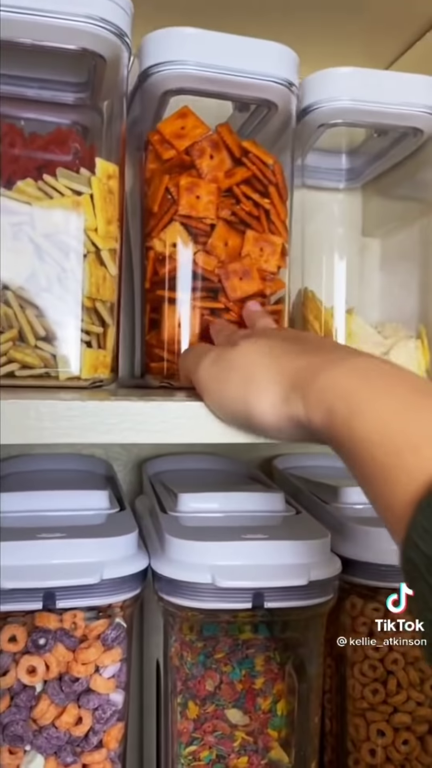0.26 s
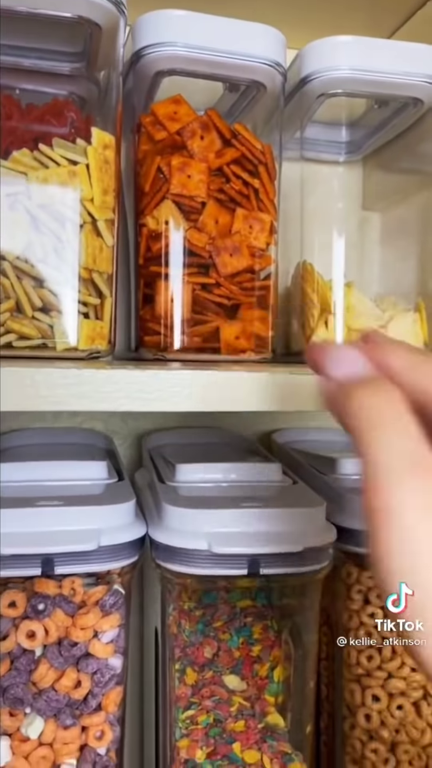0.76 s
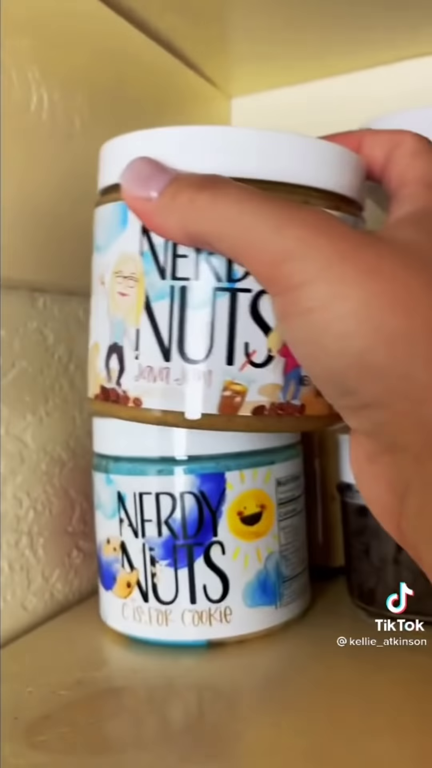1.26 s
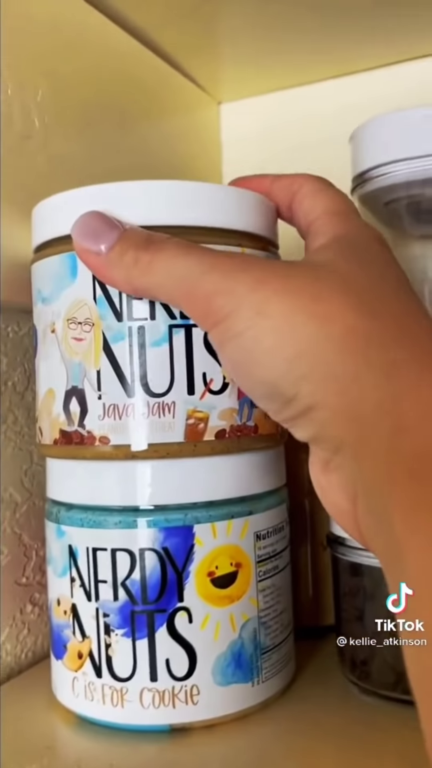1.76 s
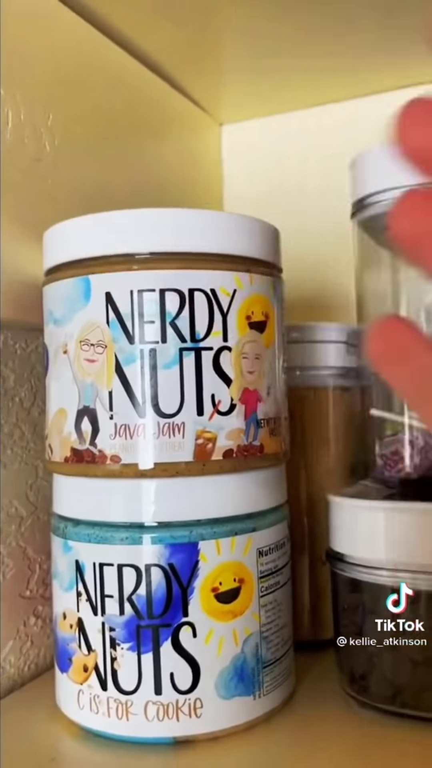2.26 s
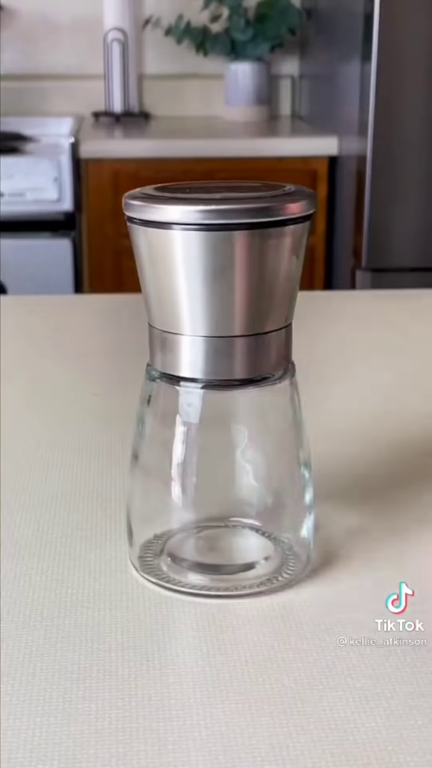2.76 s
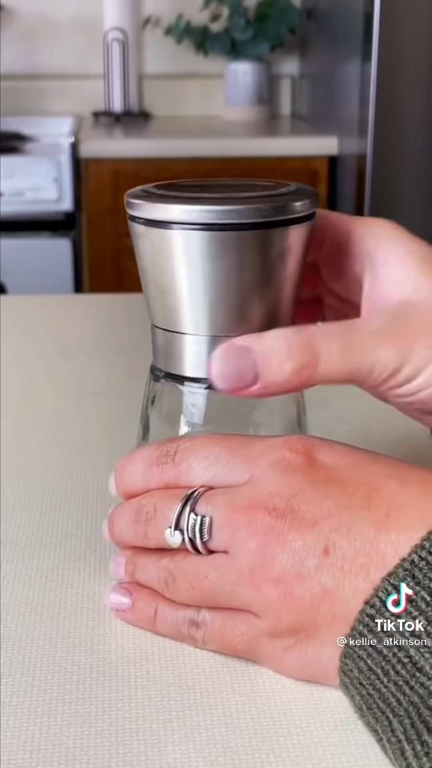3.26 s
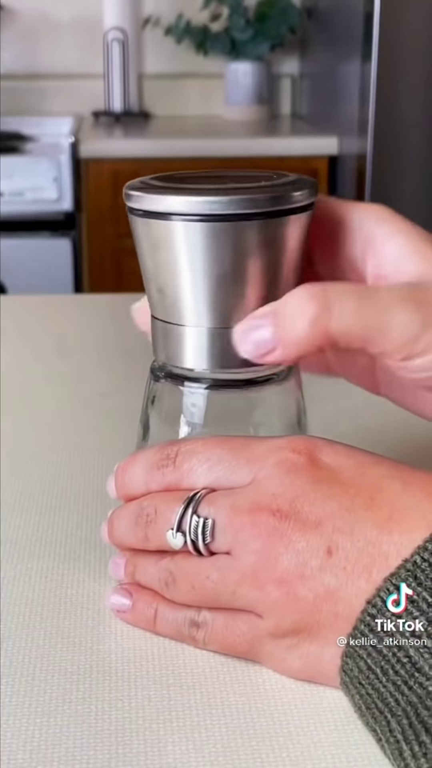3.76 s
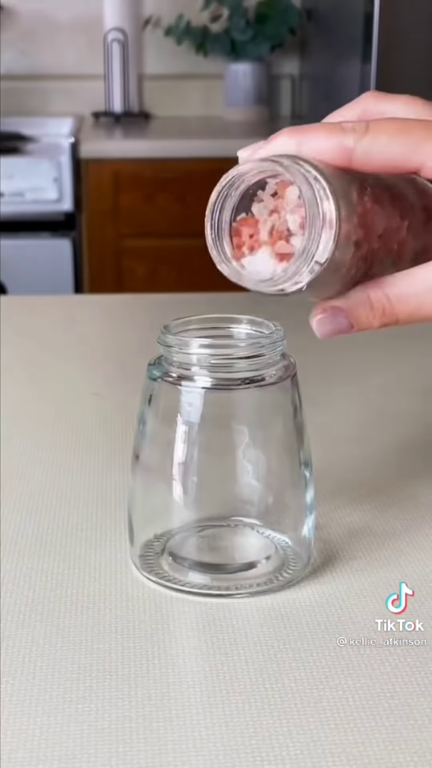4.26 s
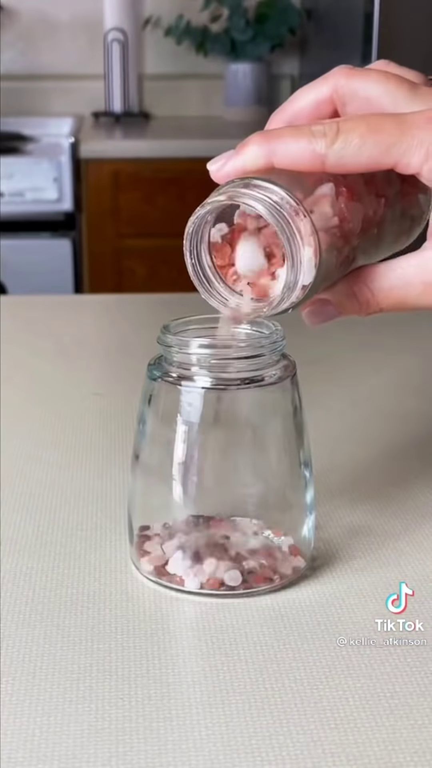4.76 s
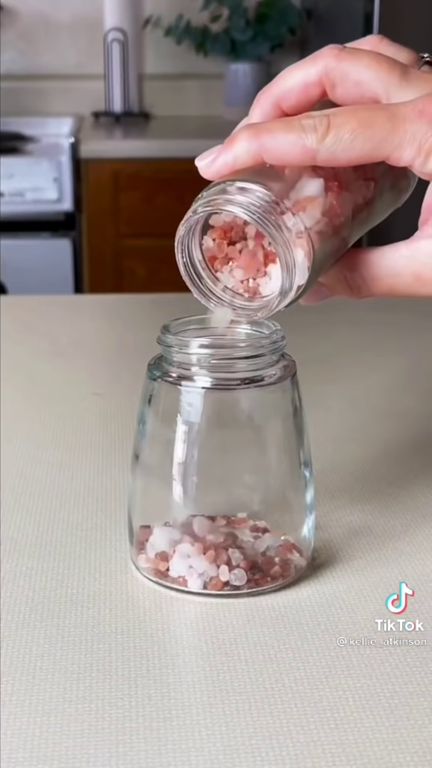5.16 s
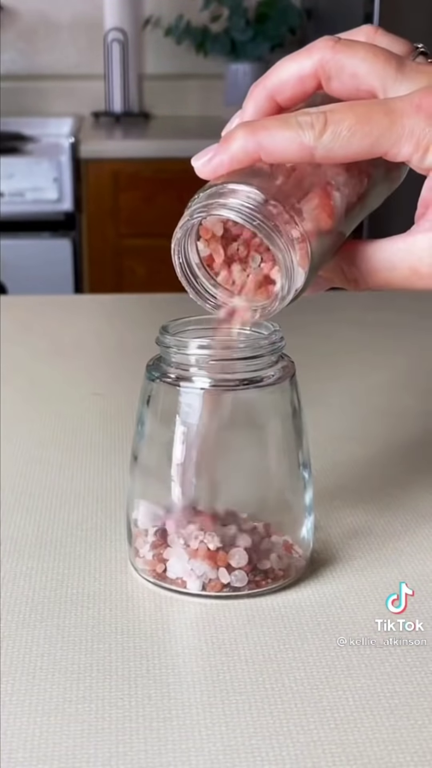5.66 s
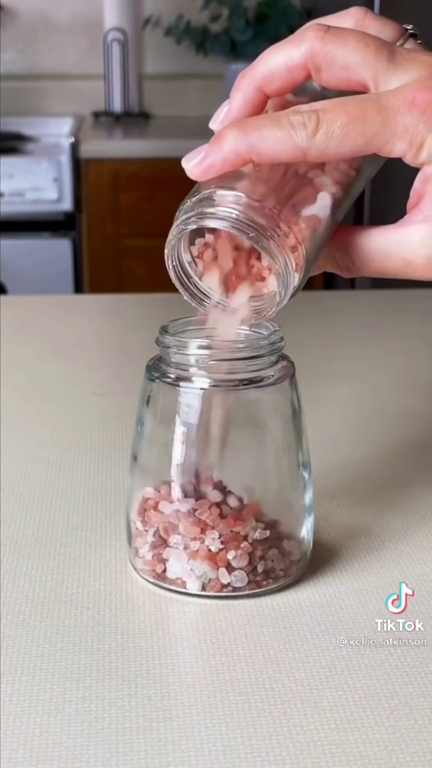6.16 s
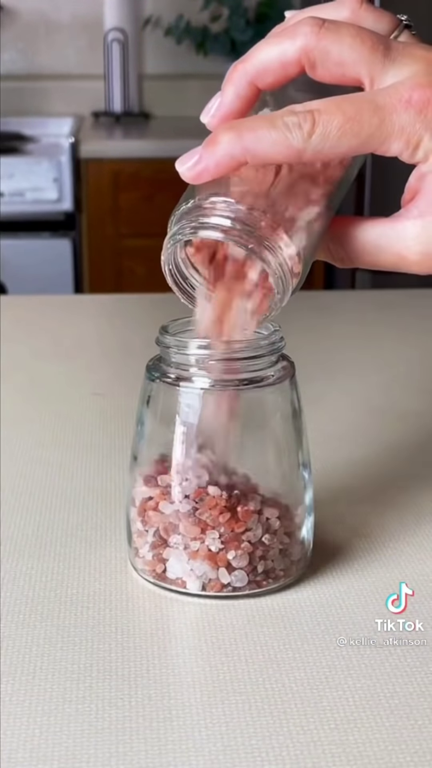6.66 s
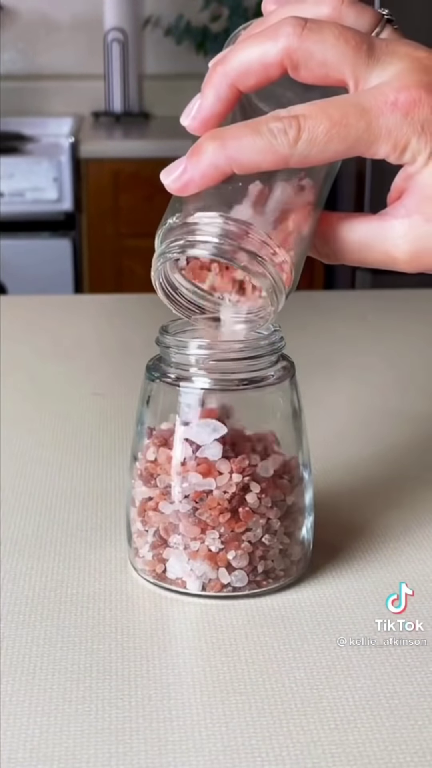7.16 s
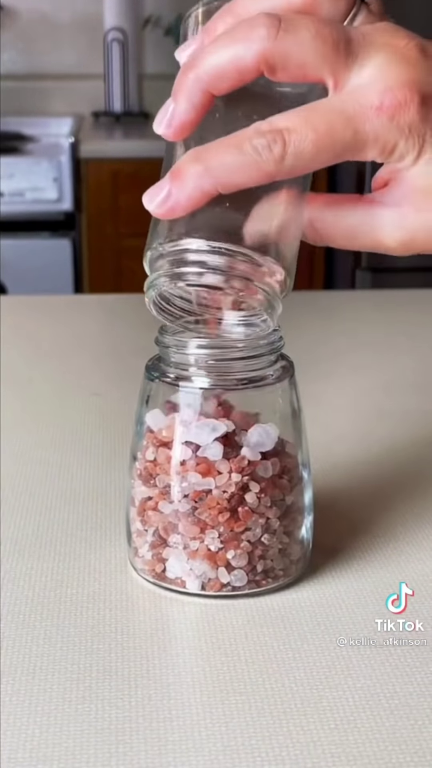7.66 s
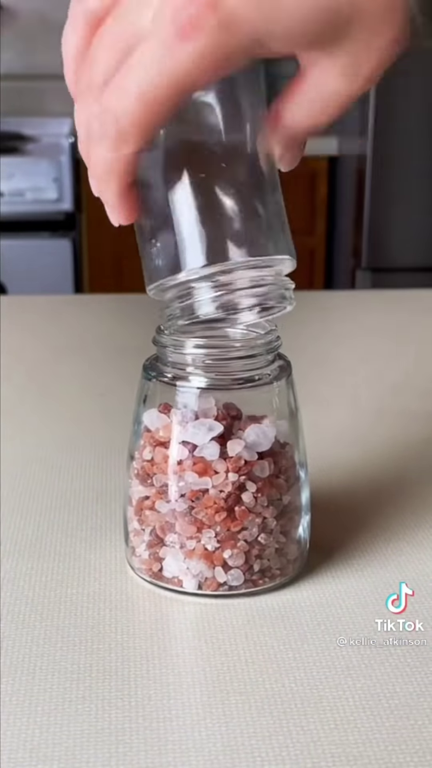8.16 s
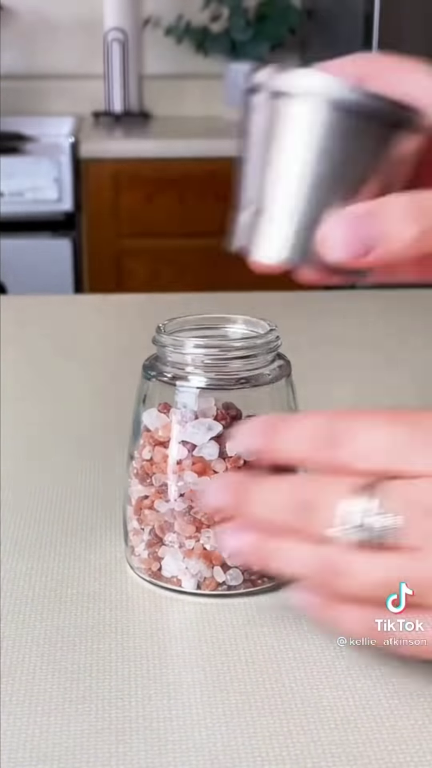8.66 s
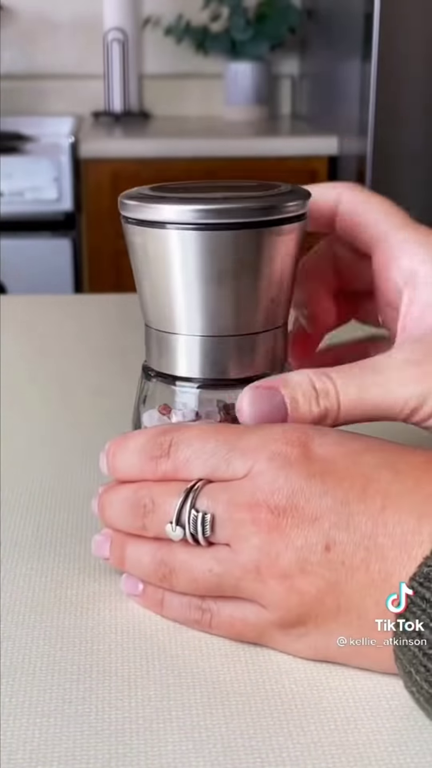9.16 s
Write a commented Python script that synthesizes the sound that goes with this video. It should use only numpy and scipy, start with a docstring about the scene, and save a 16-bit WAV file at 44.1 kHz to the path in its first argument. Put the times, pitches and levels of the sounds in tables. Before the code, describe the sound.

Close up in a pantry, a plastic tub of crackers scrapes and knocks on a wooden shelf, then a full jar thuds dully onto another. A glass grinder rattles briefly down on a kitchen counter. Its steel cap is unscrewed in scraping, clicking jerks. Coarse salt patters and fizzes into the glass, rims clink harder as the jar empties, and the cap is screwed on again.

```python
"""A tub of crackers slides and knocks onto a pantry shelf; one full jar thuds onto another. Then a glass
grinder chatters down on a counter, its steel cap is unscrewed in jerks, coarse salt patters and fizzes in
from a glass jar whose rim clinks on the neck, and the cap is screwed back on.
Knocks are dying modes or clicks through resonant bodies; rubbing and salt are clouds of tiny impacts.
Each source is a (mid, side) pair; a diffuse room tail and low rumble lie around them."""
import sys
import numpy as np
from scipy import signal
from scipy.fft import rfft, irfft
from scipy.io import wavfile
from scipy.ndimage import uniform_filter1d

SR = 44100
rng = np.random.default_rng(int(sys.argv[2]) if len(sys.argv) > 2 else 0)


def put_to_file(sound):
    """Save the sound as 16-bit audio at rate SR, in the file named by the first command-line argument."""
    columns = np.atleast_2d(sound).T  # one column per channel
    safe = np.clip(columns, -1, 1)
    whole_steps = np.round(safe * 32767)
    wavfile.write(sys.argv[1], SR, whole_steps.astype(np.int16))


N = 414981
HZ = np.fft.rfftfreq(4096, 1 / SR)
TIME = np.arange(N) / SR
AGE = TIME[:SR // 3]  # time since a hit [s]

# jar's rim and large crystals striking glass: (time [s], peak [dB], extra treble [dB])
CLINKS = [(4.4615, -36, 17), (4.618, -24, 1), (4.7274, -28.5, 6), (4.9473, -32, 12), (5.4972, -11, -3),
          (5.5433, -13.5, -3), (5.587, -16.5, 0), (5.682, -15.5, 4.5), (5.7453, -25.5, -25),
          (5.786, -25.5, -26), (5.8581, -23.5, -22), (6.223, -20, -7), (6.2489, -27.5, -20),
          (6.6767, -29, -41), (7.1645, -24, -13), (7.226, -30, 2), (7.2719, -33, 5), (7.3216, -35, 15),
          (7.3861, -27, -3), (7.436, -17.5, 3.5), (7.4891, -11, 6), (7.5493, -17, -0.5),
          (7.5959, -22.5, -2.5), (7.646, -22, -1.5), (7.6952, -10.5, -13), (7.747, -10, -9),
          (7.7876, -22.5, -27.5), (7.833, -31, -22.5), (7.885, -13.5, -2), (7.9292, -13, -5),
          (7.9769, -3.5, -2.5), (8.1665, -15.5, -1), (8.2163, -14.5, -3.5), (8.396, -34.5, -10),
          (8.4616, -12, 6), (8.5138, -26.5, 5), (8.5367, -34, -8)]
# broad colour of the glass: (frequency [Hz], level [dB])
GLASS_COLOUR = [(100, -30.5), (220, -2.5), (450, -6), (650, 0.5), (1400, -4), (2600, 1.5), (3050, -1.5),
                (3900, -1.5), (4600, -5.5), (5200, -3), (5750, -4.5), (6500, -12), (8000, -16.5),
                (10500, -24), (15500, -19)]


def gain_of(db):
    """Amplitude factor of a level in dB."""
    return 10 ** (np.asarray(db) / 20)


def evened(x):
    """Scales a (mid, side) pair to a mid RMS of one."""
    return x / np.sqrt(np.mean(x[0] ** 2) + 1e-20)


def sized(x, db, size=350):
    """Scales a hit so that the mid RMS of its first samples has the given level."""
    return gain_of(db) * x / np.sqrt(np.mean(x[0, :size] ** 2) + 1e-20)


def placed(x, width, left):
    """Scales the side of a (mid, side) pair and turns it to the left."""
    return np.array([x[0], width * x[1] + left * x[0]])


def add(mix, start_s, sound):
    """Mixes a sound in at a time, cut at the end of the mix."""
    part = mix[:, max(round(start_s * SR), 0):][:, :sound.shape[1]]
    part += sound[:, :part.shape[1]]


def wander(count, size):
    """Smooth chance of unit spread, changing over about size steps."""
    x = rng.standard_normal(count)
    x = uniform_filter1d(uniform_filter1d(x, size), size)
    return x / x.std()


def read(points, hz=HZ):
    """A spectrum joined by straight lines on a log-frequency axis."""
    point_hz, value = np.transpose(points)
    return np.interp(np.log(hz + 1), np.log(point_hz + 1), value)


def level(rows):
    """Gain along a dB curve over time, practically silent outside it."""
    return gain_of(np.interp(TIME, *np.transpose(rows), left=-150, right=-150))


def bells(rows):
    """Sum of resonance curves (frequency [Hz], width [Hz], height)."""
    return sum(height / (1 + (2 * (HZ - hz) / width_hz) ** 2) for hz, width_hz, height in rows)


def body(broad, peaks):
    """Response in dB of an object: a broad colour with resonances on top."""
    heights = [(hz, width_hz, gain_of(abs(db)) - 1) for hz, width_hz, db in peaks]
    return read(broad) + 20 * np.log10(1 + bells(heights))


def glass_body(broad, extra=()):
    """Response in dB of the glass standing on the counter."""
    # resonances: (frequency [Hz], width [Hz], height [dB])
    peaks = [(902, 54, 6.4), (1150, 130, 6.4), (1483, 50, 6.4), (1895, 46, 8.8), (2191, 54, 7.6),
             (2590, 96, 2.5), (3340, 160, 4.5), (3966, 320, 4.2), (5100, 350, 3.2), (7700, 300, 4.6)]
    # bands that glass and its counter echo cancel: (frequency [Hz], width [Hz], change [dB])
    dips = [(1430, 33, -11.5), (2072, 87, -13), (2970, 210, -8.5), (3560, 130, -4.5), (4780, 140, -4),
            (6120, 170, -7.5), (7660, 440, -2)]
    return body(broad, [*peaks, *extra]) + bells(dips)


def colour(x, db):
    """Minimum-phase filter with the given response, so that resonances ring after a click."""
    cepstrum = irfft(np.log(gain_of(db)))
    half = len(cepstrum) // 2
    cepstrum[1:half] *= 2  # folding the cepstrum makes the filter causal
    cepstrum[half + 1:] = 0
    impulse = irfft(np.exp(rfft(cepstrum)))
    return signal.oaconvolve(x, impulse[None], axes=1)[:, :x.shape[1]]


def blow(chatter_db, t60_s, dull_hz):
    """One brief contact from straight ahead, then duller chatter and echoes from nearby surfaces."""
    pole = np.exp(-2 * np.pi * dull_hz / SR)
    force = signal.lfilter([1 - pole], [1, -pole], rng.standard_normal((2, len(AGE))))
    fade = 1000 ** (-AGE / t60_s)
    force *= gain_of(chatter_db) * fade / np.linalg.norm(fade)
    click = 1. * (AGE == 0)
    force[0] += signal.lfilter(*signal.butter(2, 7500, fs=SR), click)
    return force


def ring(modes, pitch, loose):
    """Dying modes after a cushioned blow; the loose contents of the container roughen their decay."""
    tone = sum(gain_of(db) * 1000 ** (-AGE / t60_s) * np.sin(2 * np.pi * hz * pitch * AGE)
               for hz, db, t60_s in modes)
    cushioned = tone * (1 - np.exp(-AGE / 0.00078))
    rattle = np.exp(-AGE / 0.014)
    force = loose * rng.standard_normal((2, len(AGE))) * rattle / np.linalg.norm(rattle)
    force[0, 0] += 1
    return signal.fftconvolve(force, cushioned[None], axes=1)[:, :len(AGE)]


def tick(db):
    """The short snap of hard plastic."""
    # (frequency [Hz], level [dB])
    snap_colour = [(200, -22), (800, -15.5), (1500, 3), (2200, 0.5), (2700, -6.5), (4000, -6), (5500, -11),
                   (8000, -17), (11000, -20.5), (16000, -17.5)]
    return sized(colour(blow(chatter_db=5.5, t60_s=0.049, dull_hz=9000), read(snap_colour)), db)


def grains(per_s, spread_db, response, clump_db, count=6):
    """Random tiny impacts in clumps; several spots on the body each ring a little differently."""
    out = np.zeros((2, N))
    for _ in range(count):
        at = np.flatnonzero(rng.random(N) < per_s / count / SR)
        clumps = wander(N // 64 + 1, size=12)[at // 64]
        impact_db = spread_db * np.minimum(rng.exponential(1, len(at)), 4) + clump_db * clumps
        force = np.zeros((2, N))
        force[:, at] = gain_of(impact_db) * rng.choice([-1, 1], (2, len(at)))
        out += colour(force, response + 3.5 * wander(len(HZ), size=22))
    return evened(out)


def strokes(rows, rise_share, sag_db_per_s, t60_s):
    """Gain of moves (time [s], length [s], level [dB]): each swells, sags while it lasts, then dies away."""
    start, length, db = np.transpose(rows)[:, :, None]
    t = TIME[::64]
    age = np.maximum(t - start, 0)
    fade = 1000 ** (-np.maximum(age - length, 0) / t60_s)
    swell = np.minimum(age / (rise_share * length), 1)
    gains = swell * gain_of(db - sag_db_per_s * np.minimum(age, length)) * fade
    return np.interp(TIME, t, np.linalg.norm(gains, axis=0))


def contacts(rows, response, crest_db, t60_s, dull_hz, chatter_db, bass_db, softness, spot_db, detune):
    """Hits (time [s], peak [dB], treble [dB]) on a body response(time); gentler ones get more bass."""
    out = np.zeros((2, N))
    usual_db = np.mean([db for _, db, _ in rows])
    low, high = 1 / (1 + (HZ / 800) ** 2), 1 - 1 / (1 + (HZ / 6800) ** 6)
    for s, db, treble_db in rows:
        tilt = (bass_db + softness * (usual_db - db)) * low + treble_db * high
        spot = spot_db * wander(len(HZ), size=20)  # each point of contact favours other modes
        shift = 1 + detune * rng.standard_normal()  # the grip shifts them a little
        modes = np.interp(HZ * shift, HZ, response(s))
        hit = colour(blow(chatter_db, t60_s, dull_hz), modes + tilt + spot)
        add(out, s + 0.00074, sized(hit, db - crest_db))
    return out


def air():
    """Low room rumble, coloured noise: the pantry's, a moment of silence, then a blend into the kitchen's."""
    # (frequency [Hz], level [dB])
    pantry_colour = [(15, -70.5), (25, -45), (123, -3.5), (195, -9), (317, -14.5), (363, -32), (476, -23),
                     (516, -27.5), (1890, -48.5), (4490, -51.5), (5880, -58.5), (11300, -58), (16000, -53)]
    kitchen_colour = [(15, -90.5), (25, -45), (149, -14), (236, 2.5), (326, -14.5), (354, -2), (560, -16),
                      (624, -12), (695, -16.5), (796, -27), (1130, -26.5), (1740, -38), (8360, -48.5),
                      (14800, -51), (16000, -47)]
    pantry_ends_s, kitchen_starts_s = 2.419, 2.44
    in_pantry, in_kitchen = (evened(colour(rng.standard_normal((2, N)), read(points)))
                             for points in (pantry_colour, kitchen_colour))
    blend = np.clip((TIME - 2.45) / .5, 0, 1)
    audible = 1. * ((TIME < pantry_ends_s) | (TIME > kitchen_starts_s))
    rumble = gain_of(-50.5) * np.sqrt(1 - blend) * in_pantry + gain_of(-53.0) * np.sqrt(blend) * in_kitchen
    return uniform_filter1d(audible, size=200) * rumble


def room(x):
    """A diffuse noise tail on the mid signal, each band dying at its own speed."""
    # (frequency [Hz], t60 [s])
    decay = [(100, 0.57), (500, 0.41), (2000, 0.2), (6000, 0.18), (15000, 0.19)]
    hz, t, z = signal.stft(rng.standard_normal((2, SR // 2)), SR, nperseg=256)
    fade = 1000 ** (-t / read(decay, hz)[:, None])
    build_up = np.minimum(t / 0.036, 1)
    tail = signal.istft(z * fade * build_up, SR, nperseg=256)[1]
    return signal.oaconvolve(x[:1], tail / np.linalg.norm(tail[0]), axes=1)[:, :N]


def hands():
    """Skin and sleeve hiss faintly over the containers: dense tiny impacts."""
    # fingers and sleeve brushing: (time [s], length [s], relative level [dB])
    brushes = [(-0.05, 0.2, -52.5), (0.2, .2, -55.5), (0.4, 0.4, -58), (0.72, .14, -55.5),
               (0.98, 0.088, -70.5), (1.27, 0.54, -62), (2.27, 0.011, -45), (2.71, 0.23, -70),
               (4.02, .1, -73.5)]
    # (frequency [Hz], level [dB])
    skin_colour = [(500, -6), (2000, -2), (5000, -3.5), (8000, -4), (10000, -7.5), (15000, -8)]
    touch = strokes(brushes, rise_share=0.25, sag_db_per_s=20, t60_s=0.15)
    hiss = grains(per_s=5000, spread_db=-0.5, response=read(skin_colour), clump_db=-1.5)
    return gain_of(2.0) * touch * hiss


def pantry():
    """The tub slides and knocks on a wooden shelf, its crackers shifting inside; full jars thud dully."""
    # shoves sliding the tub: (time [s], length [s], level [dB])
    shoves = [(-0.01, 0.23, -28.5), (0.25, 0.15, -34.5), (0.43, 0.13, -44.5), (0.68, 0.18, -50)]
    # tub knocks: (time [s], shelf thud [dB], plastic clack [dB], sharp tick [dB], shelf pitch [factor])
    tub_knocks = [(0.013, -26, -29, -57, 1.14), (0.054, -44, -40, -41.5, 1.33),
                  (0.081, -31, -34.5, -54, 0.88), (0.168, -33.5, -40.5, -60, 1.0),
                  (0.513, -16, -33.5, -37.5, 1.106), (0.562, -30, -46.5, -63, 1.07),
                  (0.657, -21.5, -18, -32.5, 1.05), (0.8179, -53, -45.5, -29, 0.97),
                  (0.951, -51, -57.5, -64, 1.02)]
    # jar bumping on jar, fingers letting go: (time [s], thud [dB], tick [dB])
    jar_bumps = [(1.411, -36, -56), (1.524, -45, -58.5), (1.779, -22, -44.5), (1.797, -37, -66),
                 (1.815, -36.5, -72), (1.89, -50, -72), (2.026, -50.5, -66), (2.186, -48.5, -66.5),
                 (2.258, -38, -65.5), (2.274, -36.5, -55)]
    # modes of shelf, tub and jars: (frequency before pitch factor [Hz], level [dB], t60 [s])
    shelf_modes = [(77, -14.5, 0.47), (131.3, -7, 0.22), (190.3, 0, 0.11), (256, 4, 0.083),
                   (320, 7.5, 0.034), (367, -0.5, 0.089), (493, 0, 0.051), (677, -10, 0.07)]
    tub_modes = [(464, 0, 0.031), (618, 8.5, 0.016), (790, -11, 0.02), (937, -3, 0.034),
                 (1118, -6.5, 0.035), (1537, 10.5, 0.024), (1430, -15.5, 0.066), (1920, -26.5, 0.047)]
    jar_modes = [(114, -15, 0.42), (155.2, -12, 0.43), (197, 2, 0.13), (283, -2.5, 0.077), (380, -8, 0.077),
                 (604, -13, 0.062), (800, -20, 0.056)]
    # rubbing and cracker colours: (frequency [Hz], level [dB])
    rub_colour = [(50, -20), (120, -17), (250, 4.5), (400, -1.5), (750, -7), (1000, -14.5), (1700, -16),
                  (2500, -21), (4000, -30), (9000, -46)]
    cracker_colour = [(500, -27.5), (900, -3.5), (1500, 0), (2200, -7), (3200, -4.5), (5000, -17.5),
                      (9000, -31.5)]
    # rubbing resonances: (frequency [Hz], width [Hz], height [dB])
    rub_peaks = [(193, 33, 1), (396, 34, 2.5), (760, 50, 10), (1540, 240, 11.5), (2120, 156.5, 0.5)]
    slide = strokes(shoves, rise_share=.15, sag_db_per_s=49.5, t60_s=0.23)
    rubbing = grains(per_s=900, spread_db=2.5, response=body(rub_colour, rub_peaks), clump_db=0.5)
    crackers = grains(per_s=390, spread_db=0.0, response=read(cracker_colour), clump_db=-3.5)
    out = placed(slide * rubbing + gain_of(-20.5) * slide * crackers, width=.8, left=.2)
    for s, thud_db, clack_db, tick_db, pitch in tub_knocks:
        add(out, s, placed(sized(ring(shelf_modes, pitch, loose=0.76), thud_db), width=.5, left=.25))
        add(out, s, placed(sized(ring(tub_modes, 0.928, loose=0.38), clack_db), width=1.1, left=.55))
        add(out, s, tick(tick_db))
    for s, thud_db, tick_db in jar_bumps:
        thud = placed(sized(ring(jar_modes, 0.93, loose=0.75), thud_db), width=0.46, left=0.21)
        add(out, s, thud + tick(tick_db))
    # the pantry sounds carry no deep bass below about 68 Hz
    return signal.sosfilt(signal.butter(8, 68, "high", fs=SR, output="sos"), out)


def grinder_base():
    """The thick glass base rocks quickly to rest on the counter: a burst of clicks through its resonances."""
    # (time [s], level [dB])
    rocks = [(2.4414, -25.5), (2.449, -26.5), (2.456, -29.5), (2.466, -27), (2.485, -27.5), (2.493, -34),
             (2.504, -29.5), (2.52, -30.5), (2.716, -64.5)]
    # (frequency [Hz], level [dB])
    base_colour = [(100, -74), (350, -10.5), (500, -3.5), (900, -3), (1500, -4.5), (2500, 0), (3500, -6.5),
                   (5000, -12.5), (7000, -23.5), (10000, -26), (15000, -31.5)]
    # (frequency [Hz], width [Hz], height [dB])
    base_peaks = [(889, 38, 19.6), (1250, 38, 12), (1680, 69, 2.6), (2244, 49, 12), (2560, 100, 7.1),
                  (3300, 100, 5), (4250, 90, 11), (5010, 150, 8), (10300, 390, 7.6)]
    out, response = np.zeros((2, N)), body(base_colour, base_peaks)
    for s, db in rocks:
        add(out, s, sized(colour(blow(chatter_db=12.5, t60_s=0.14, dull_hz=7200), response), db))
    return placed(out, width=0.57, left=.05)


def steel_cap():
    """The cap jerks along the thread: snap, scrape, knock to a stop; pressed home, the counter grumbles."""
    # jerks on the glass thread: (time [s], peak [dB], slip length [s], extra treble [dB])
    catches = [(3.02, -33.5, 0.0058, -14), (3.208, -31.5, .004, 0), (3.231, -24.5, 0.0097, 3),
               (3.283, -24.5, 0.021, -26), (3.395, -22, 0.021, 10), (3.448, -25, 0.015, 5),
               (3.477, -24.5, 0.019, -3), (3.537, -18.5, 0.021, 6), (3.6329, -17, .002, 3),
               (3.677, -18, .019, -4), (3.721, -17.5, 0.023, 7), (3.773, -19, 0.014, -3),
               (3.847, -23.5, 0.018, -4), (3.888, -19.5, 0.0052, 12), (3.932, -23.5, .012, 5),
               (8.845, -24, .004, 4.5), (8.876, -29.5, 0.009, 13), (8.969, -27.5, .005, 5),
               (9.053, -29, 0.0044, 4), (9.11, -22.5, 0.0095, 12), (9.153, -32, 0.02, 12),
               (9.194, -24, 0.021, 9), (9.252, -15.5, 0.01, 9), (9.288, -16, 0.0075, 0),
               (9.337, -38, 0.0049, -12)]
    # steel and counter colours: (frequency [Hz], level [dB])
    steel_colour = [(80, -46.5), (210, 12.5), (310, 0), (420, 7.5), (550, 2), (800, 5), (1600, -3),
                    (2400, 0), (4000, -9), (5200, -9), (6800, -18.5), (8500, -17.5), (12000, -28),
                    (15500, -29.5)]
    counter_colour = [(120, -27.5), (220, 1.5), (420, 4.5), (680, 8), (900, 3), (1300, -5), (2500, -43)]
    # steel resonances: (frequency [Hz], width [Hz], height [dB])
    steel_peaks = [(695, 41, 5.9), (886, 55, 7.8), (1356, 40, 16.4), (1816, 26, 8.9), (2250, 47, 2.8),
                   (3430, 150, 6.1), (5210, 220, 5.3)]
    snap_chatter_db, stop_chatter_db = 7, 5.5
    stop_db, stop_treble_db = -4.5, -12  # stop against snap
    usual_slip_s = 0.018  # a longer slip ends in a harder knock
    press_from_s = 8.7  # cap going back on: jerks also press the glass on the counter

    response = body(steel_colour, steel_peaks)
    slips = [(s, slip_s, db) for s, db, slip_s, _ in catches]
    # scrape and press levels are against each jerk's peak
    scrape = gain_of(-21.5) * strokes(slips, rise_share=0.51, sag_db_per_s=0, t60_s=0.19)
    press = gain_of(-16) * strokes(slips, rise_share=0.98, sag_db_per_s=0, t60_s=0.13)
    press *= TIME > press_from_s
    damped = (response + read(steel_colour)) / 2  # the grip damps the ring
    rubbing = scrape * grains(per_s=900, spread_db=6.5, response=damped, clump_db=2.5)
    grumble = press * grains(per_s=1000, spread_db=2.5, response=read(counter_colour), clump_db=-0.5)

    snaps = [(s, db, treble_db) for s, db, _, treble_db in catches]
    stops = [(s + slip_s, db + stop_db + 10 * np.log10(slip_s / usual_slip_s), treble_db + stop_treble_db)
             for s, db, slip_s, treble_db in catches]
    knocks = sum(contacts(rows, lambda s: response, crest_db=11.5, t60_s=0.064, dull_hz=7170,
                          chatter_db=chatter_db, bass_db=-2.5, softness=1.0, spot_db=3.5, detune=0.044)
                 for rows, chatter_db in ((snaps, snap_chatter_db), (stops, stop_chatter_db)))
    return rubbing + grumble + knocks


def glass_rims():
    """The jar's mouth clinks and drags on the grinder's neck; its own ring is freer once nearly empty."""
    # jar's own ringing: (time [s], thin high ring [dB], bright lower ring [dB])
    jar_ring = [(5.6, -5, -0.5), (7.2, 25, 4), (7.75, 23.5, 2.5), (8.2, 14, 7)]
    # rim dragging on rim as the jar empties: (time [s], length [s], level [dB])
    drags = [(6.9, 0.81, -57.5), (8.01, 0.073, -47), (8.29, 0.21, -46)]
    # (frequency [Hz], level [dB])
    rim_colour = [(200, -32), (550, -2.5), (900, -4), (1700, -5), (2100, -16.5), (2600, -13), (4000, -25),
                  (7000, -60)]
    half_tipped_s, weight_db_per_s = 6.93, 3  # the steeper the jar is tipped, the more bass in its knocks

    def response(s):
        times, thin_db, bright_db = np.transpose(jar_ring)
        rings = [(14500, 400, np.interp(s, times, thin_db)), (5300, 1100, np.interp(s, times, bright_db))]
        weight = weight_db_per_s * (s - half_tipped_s) / (1 + (HZ / 1000) ** 2)
        return glass_body(GLASS_COLOUR, rings) + weight

    clinks = contacts(CLINKS, response, crest_db=14.5, t60_s=0.065, dull_hz=3000, chatter_db=0.0,
                      bass_db=-0.5, softness=0.51, spot_db=2.0, detune=0.0062)
    drag = strokes(drags, rise_share=0.15, sag_db_per_s=11.5, t60_s=0.17)
    rubbing = grains(per_s=2000, spread_db=2.5, response=glass_body(rim_colour), clump_db=2.0)
    return placed(clinks, width=1.32, left=0.056) + drag * rubbing


def salt():
    """Crystals patter on glass and fizz together; the growing heap dulls the ring and makes the fizz finer."""
    # steady stream: (time [s], flow [dB])
    flow_curve = [(4.46, -69), (4.85, -58), (5.35, -60.5), (5.85, -60), (6.3, -58.5), (6.6, -60.5),
                  (7.25, -57.5), (7.8, -60.5), (8.56, -70)]
    # first spurts, landing on bare glass: (time [s], length [s], level [dB])
    spurt_rows = [(4.457, 0.12, -56), (4.61, 0.019, -56.5), (4.724, 0.093, -55.5)]
    # single crystal's tick, crystals fizzing, salt on salt, bare bottom: (frequency [Hz], level [dB])
    crystal_colour = [(800, -21.5), (2500, -2.5), (7000, -3), (11000, -1.5), (15000, 0)]
    fizz_colour = [(3000, -24.5), (6500, 3), (8500, 2), (10500, -1), (13000, 1), (14800, 8), (16000, 7.5)]
    heap_fizz_colour = [(6000, -23), (10500, -19.5), (12800, 4), (15000, 7.5)]
    bottom_colour = [(300, -40), (1400, -22), (1750, -12.5), (1900, 0.5), (2020, -6), (2250, -23),
                     (6000, -44)]
    # levels against the patter
    fizz_db, spurt_fizz_db, heap_fizz_db = -7.5, 0, -6
    bottom_db, buried_db = -5, -2  # bare bottom's ring, and its change under the full heap

    surges = gain_of(1.5 * np.repeat(wander(N // 64 + 1, size=45), 64)[:N])
    stream = level(flow_curve) * surges
    spurts = strokes(spurt_rows, rise_share=0.041, sag_db_per_s=25, t60_s=0.13)
    # each clink sets crystals rattling
    shakes = [(s, .015, db) for s, db, _ in CLINKS]
    shaken = gain_of(-42.5) * strokes(shakes, rise_share=.7, sag_db_per_s=-1, t60_s=0.24)
    poured = np.hypot(stream, spurts)
    flow = np.hypot(poured, shaken)
    heap = np.cumsum(stream) / stream.sum()  # 0 empty, 1 full

    on_bare = glass_body(GLASS_COLOUR)
    softened = -3.6 * np.log2(1 + (HZ / 2600) ** 2)
    on_glass = flow * (1 - 0.41 * heap) * grains(
        per_s=500, spread_db=2.5, response=on_bare + softened, clump_db=0.5)
    on_heap = gain_of(-1) * flow * heap * grains(
        per_s=700, spread_db=4.0, response=read(GLASS_COLOUR) + softened, clump_db=-4.0)
    coarse = gain_of(-11.5) * flow * grains(per_s=45, spread_db=5.0, response=on_bare, clump_db=3.5)
    ticks = gain_of(-19) * poured * grains(
        per_s=14, spread_db=5.0, response=read(crystal_colour), clump_db=-2.0)
    fizz_gain = np.hypot(gain_of(fizz_db) * stream * (1 - heap ** 2), gain_of(spurt_fizz_db) * spurts)
    fizz = fizz_gain * grains(per_s=990, spread_db=4.5, response=read(fizz_colour), clump_db=4.5)
    fine = gain_of(heap_fizz_db) * stream * heap * grains(
        per_s=1600, spread_db=5.5, response=read(heap_fizz_colour), clump_db=4.5)
    bottom_gain = gain_of(bottom_db + buried_db * heap ** 2) * np.hypot(stream, gain_of(8) * spurts)
    bottom = bottom_gain * grains(per_s=540, spread_db=4, response=read(bottom_colour), clump_db=5.5)
    return gain_of(-0.27) * (on_glass + on_heap + coarse + ticks + fizz + fine + bottom)


def scene():
    """All sources as mid and side, then spread over left and right."""
    # side level, close to the cupboard's walls and elsewhere: (frequency [Hz], level [dB])
    pantry_width = [(60, -35), (200, -30.5), (500, -22), (1100, -3.5), (2400, -2.5), (4500, -6.5),
                    (9000, 0), (15000, -1.5)]
    kitchen_width = [(30, -15), (70, -24.5), (200, -19.5), (500, -13), (1200, -8), (2400, -3.5),
                     (4500, -21.5), (9000, -16), (15000, -10)]
    # (frequency [Hz], left over right [dB])
    lean = [(200, 0), (600, 1.5), (1300, 1), (2600, 2), (4500, 0), (16000, 0)]
    shelf, base, cap, rims, pour = pantry(), grinder_base(), steel_cap(), glass_rims(), salt()
    wet = room(gain_of(-30) * shelf + gain_of(-16) * base + gain_of(-16.5) * cap
               + gain_of(-18.0) * rims + gain_of(-9.5) * pour)
    wide = shelf + hands()
    ahead = base + cap + rims + pour + wet + air()
    mid = wide[0] + ahead[0]
    side = colour(wide[1:], read(pantry_width)) + colour(ahead[1:], read(kitchen_width))
    left = colour(mid + side, read(lean) / 2)
    right = colour(mid - side, -read(lean) / 2)
    return np.vstack([left, right])


def record(dry):
    """Band limit: a steep linear-phase low-pass."""
    edge_hz = 15500
    low_pass = signal.firwin(255, edge_hz, window=("kaiser", 8), fs=SR)
    return signal.oaconvolve(dry, low_pass[None], "same")


dry = scene()
out = record(dry)
put_to_file(out)
```